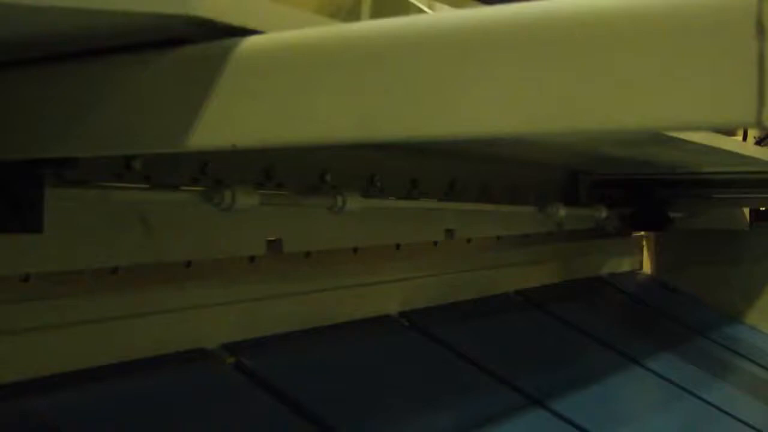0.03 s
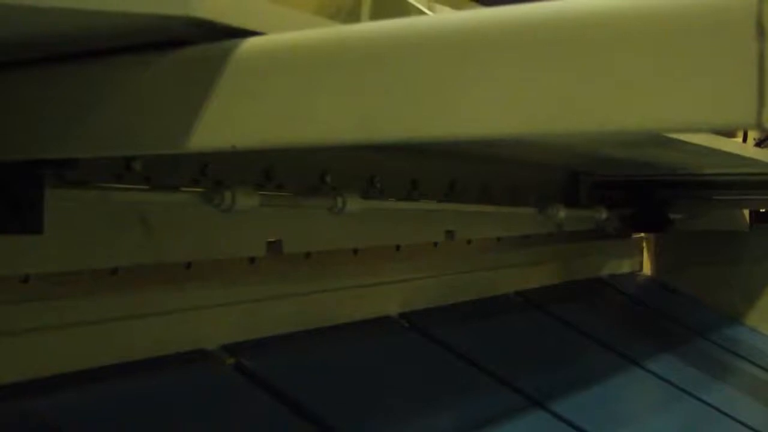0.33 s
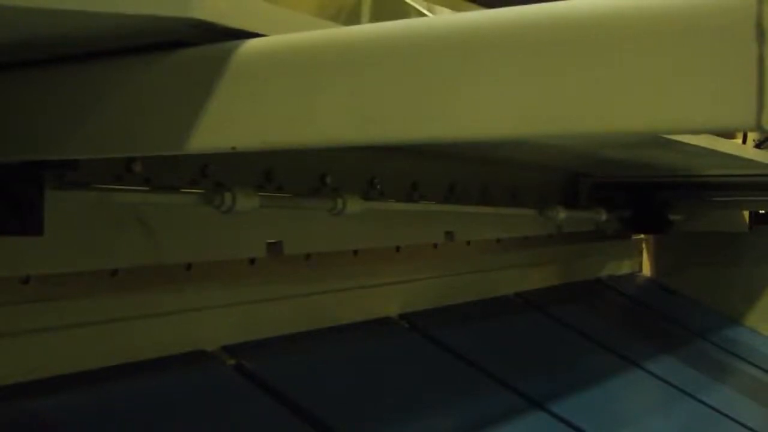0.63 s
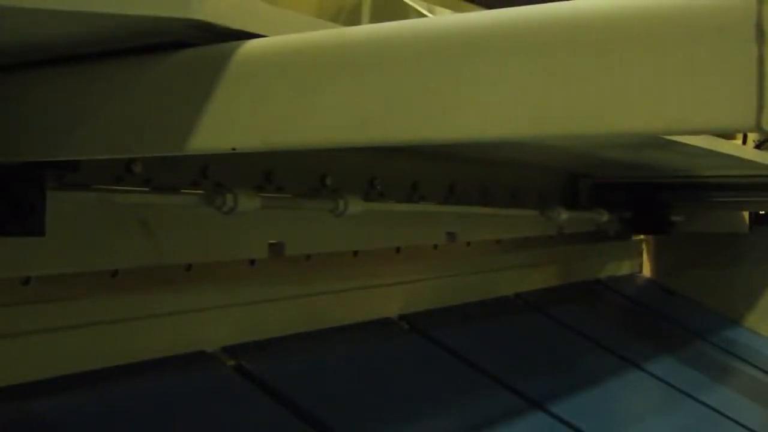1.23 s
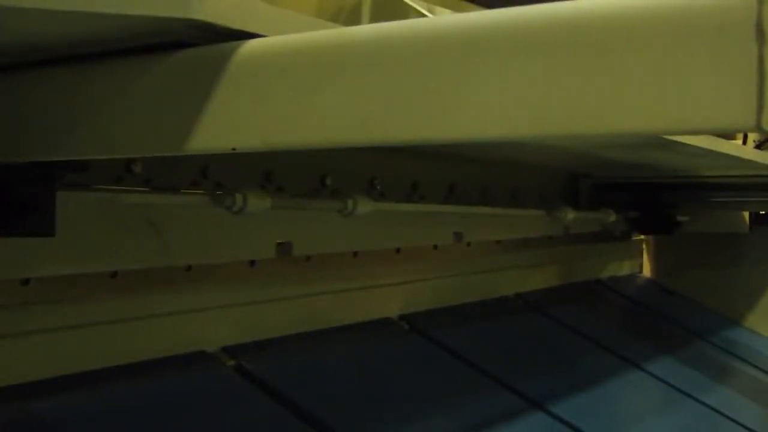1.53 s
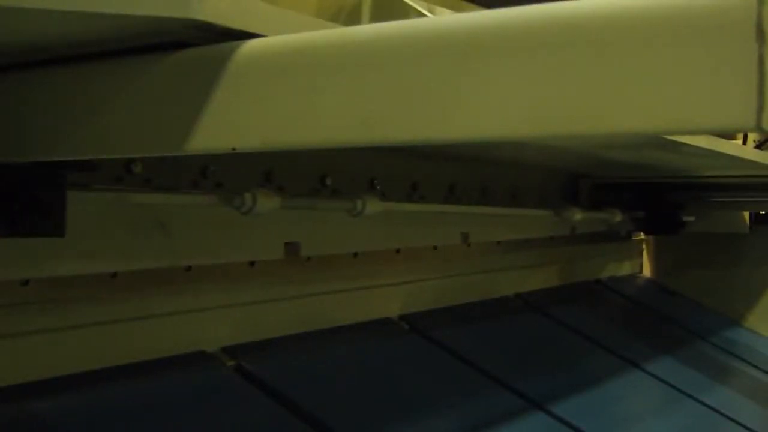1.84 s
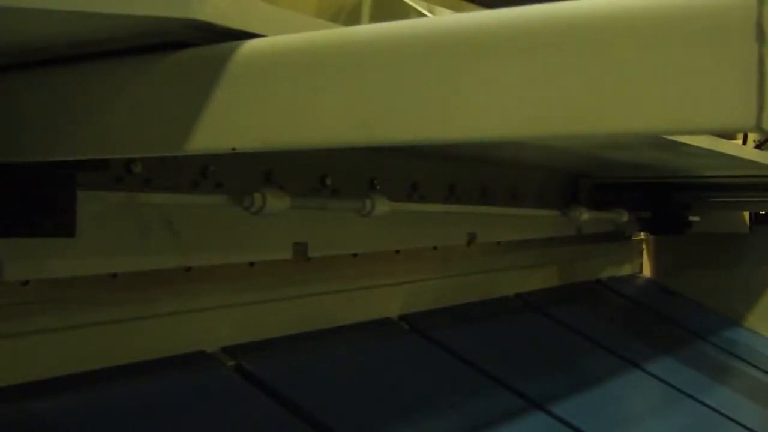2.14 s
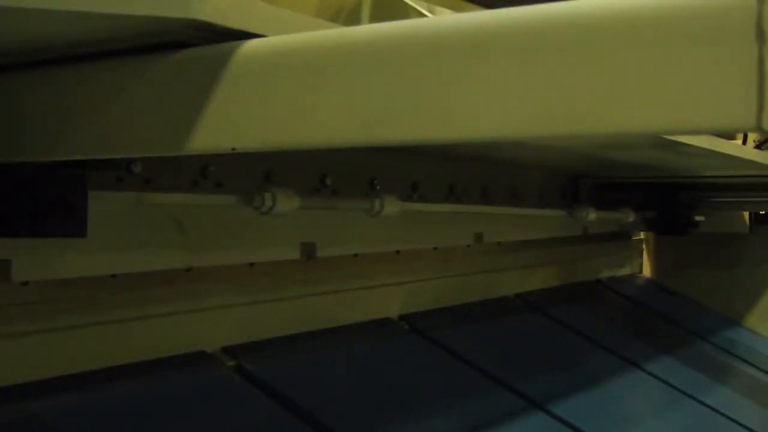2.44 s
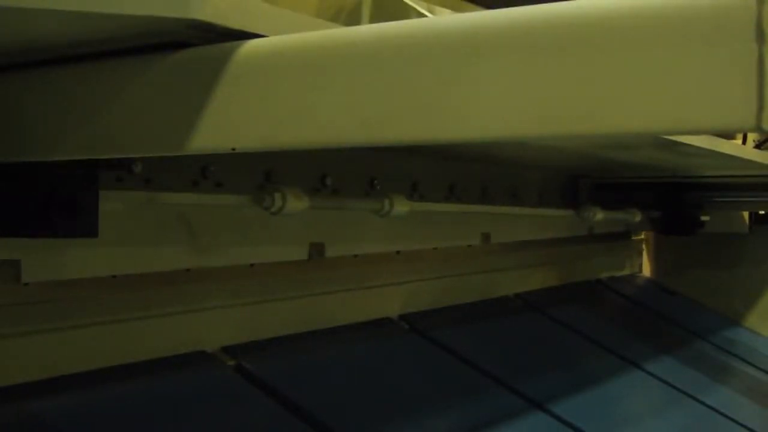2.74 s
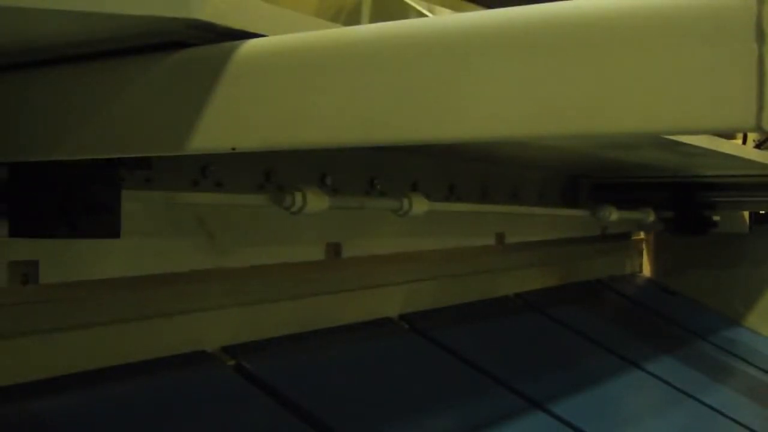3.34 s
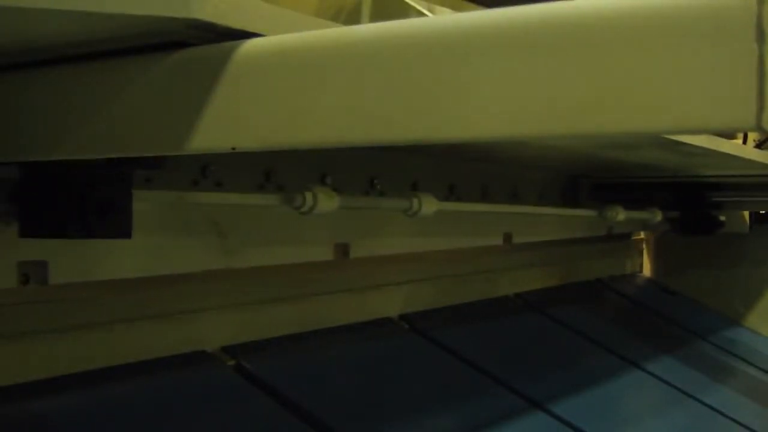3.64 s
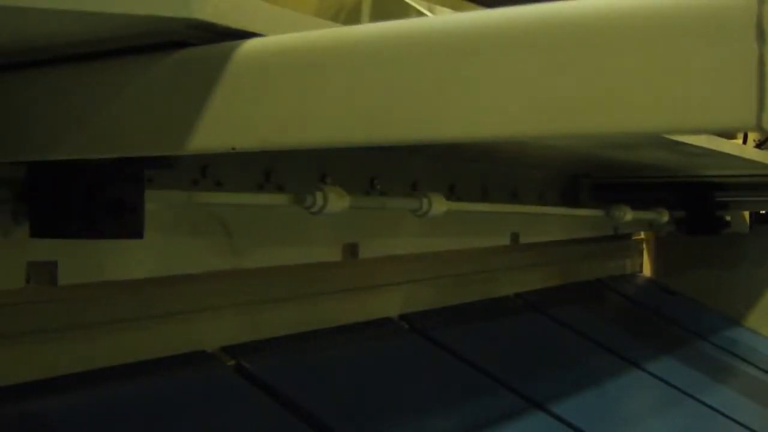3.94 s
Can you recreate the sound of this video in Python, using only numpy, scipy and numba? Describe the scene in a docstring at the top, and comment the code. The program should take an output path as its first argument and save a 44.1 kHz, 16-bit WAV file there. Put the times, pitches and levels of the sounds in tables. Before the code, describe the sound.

Motorised whirr of a metal shear's back gauge travelling, over a humming, hissing pump.

```python
"""Behind a sheet-metal shear, the hydraulic pump hums, whines and hisses throughout, and a valve sings.
The back gauge starts to travel: its lead screw whirrs and throbs at a tight spot once a turn,
and its carriage scrapes along the guides, where sliding friction excites the modes of the rail.
Reflections in the steel housing spread the sound; the recorder's gain ducks as the screw gets loud.
"""
import sys
import numpy as np
from scipy import signal
from scipy.fft import rfft, irfft
from scipy.io import wavfile
from scipy.ndimage import uniform_filter1d, map_coordinates
from numba import njit

SR = 44100
rng = np.random.default_rng(int(sys.argv[2]) if len(sys.argv) > 2 else 0)


def dump(signal):
    """Clip the signal to [-1, 1] and save it as 16-bit WAV at the path in sys.argv[1]."""
    limited = np.clip(np.atleast_2d(signal).T, -1, 1)
    pcm = np.round(limited * 32767).astype(np.int16)
    wavfile.write(sys.argv[1], SR, pcm)


N = 176400
T = np.arange(N) / SR
FREQS = np.fft.rfftfreq(N, 1 / SR)


def lead_screw(turn_hz=10.663, tight_spot_s=2.27, upper_above_hz=600, flicker_db=1.63):
    """Harmonics of the turn rate interfere to swell at the tight spot; rolling noise throbs with them."""
    # screw tones: multiple (rounded to a harmonic), level_db, scatter_cycles, drift_db_per_s
    screw_tones = [(15, -53, 0.79, -1), (20, -45.5, 0.95, 4.5), (25, -42, 0.78, 1.5), (26, -41.5, 0.48, 1),
                   (38, -32, 0.97, 0.5), (40, -24, 0.13, 1.5), (41, -27.5, 0.14, 0.5),
                   (42, -27.5, 0.018, 1.5), (43, -29, 0.055, 1.5), (50, -30.5, 1, -2), (54, -44, 1, 7),
                   (54.8, -50, 1, -3), (67.34, -24, 0, -1.5), (67.95, -28, 0.04, -1.5),
                   (68.4, -35.5, 0.024, -1.5), (75, -41, 0.71, 8.5), (76.45, -29, 0.88, 1),
                   (86, -37, 0.85, 2.5), (92, -30, 0.43, 1), (94.95, -29.5, 1, 1), (99.2, -29.5, 0.76, -3),
                   (104.6, -29, 0.91, -4), (112, -31.5, 0.7, -5), (116.2, -34, 0.25, -10.5),
                   (116.8, -32, 0.5, -1), (117.6, -26, 0.12, -2), (155.4, -39, 0.85, -1)]
    # level of the whole screw: time_s, level_db
    drive_level = [(0, -67), (1.1, -52), (1.22, -8), (1.32, 3), (1.45, 1), (1.8, -0.5), (2.35, 1),
                   (2.65, 2), (2.85, -0.5), (3.4, 1), (3.85, -0.5), (4, -1.5)]
    # further gain of the upper tones and rolling noise: time_s, gain_db
    upper_level = [(1.2, -3), (1.6, 0.5), (2.3, 1), (2.65, -1), (2.9, -0.5), (3.45, -3.5), (3.65, -1),
                   (4, 3)]
    # rolling noise of the nut: frequency_hz, density_db
    roll_spectrum = [(60, -46), (120, -29), (160, -19.5), (280, -8.5), (370, -9), (410, -5.5), (465, -7),
                     (500, -2), (560, 0), (720, -3.5), (850, -1.5), (1100, -2), (1280, -3), (1400, -9),
                     (1700, -8.5), (2400, -16.5), (4500, -33), (12000, -44)]
    turns = turn_hz * (T - tight_spot_s) + 0.00092 * walk(7)  # slight slip
    upper_gain, tones = curve(upper_level), 0
    for multiple, db, scatter, drift in screw_tones:
        offset = scatter * rng.uniform(-0.51, 0.52)  # without scatter, crests meet at the tight spot
        tone = np.sqrt(2) * np.cos(2 * np.pi * (round(multiple) * turns + offset))
        gain = undb(db + drift * (T - tight_spot_s) + flicker_db * walk(5.5))
        tones += tone * gain * (upper_gain if multiple * turn_hz > upper_above_hz else 1)
    throb = 1 + 0.11 * np.cos(2 * np.pi * (turns + 0.015 * turn_hz))  # peaks 15 ms before the tight spot
    roll = undb(-17.5) * colour(rotor_noise(turns, turn_hz, repeat_share=0.44), roll_spectrum)
    return curve(drive_level) * (tones + upper_gain * throb * roll)


def carriage():
    """Sliding friction excites the rail's modes and rasps where the carriage bites; brief tones ring."""
    # level of the scrape: time_s, level_db
    scrape_level = [(0, -55), (.55, -44), (.8, -28.5), (1.08, -25.5), (1.16, -19), (1.25, -15),
                    (1.36, -17.5), (1.6, -20.5), (2, -33.5), (2.66, -30), (2.715, -10), (2.78, -12),
                    (2.95, -14.5), (3.22, -14.5), (3.5, -20.5), (4, -28.5)]
    # spectrum of the scrape: frequency_hz, density_db
    scrape_spectrum = [(100, -42), (500, -20), (950, 5.5), (1550, 1), (2100, 0), (2500, -4), (3300, -6),
                       (4300, -14), (5500, -24), (8000, -30), (12000, -41)]
    # guide rail modes, relative to the scrape: pitch_hz, level_db
    rail_modes = [(1545, -7.5), (1670, -16), (1820, -12.5), (2065, -17), (2380, -18.5), (2770, -18),
                  (2900, -20), (3480, -23)]
    # ringing as the screw runs up and the carriage slides: peak_s, pitch_hz, level_db, half_width_s
    brief_tones = [(0.974, 1026, -26.5, 0.16), (1.186, 1308, -24, 0.083), (1.3, 1095, -23, 0.18),
                   (1.55, 1120, -28, 0.073), (2.712, 1550, -18, .035), (2.737, 2750, -20.5, 0.052),
                   (3.62, 977, -20, 0.068)]
    # rasps: peak_s, level_db, half_width_s
    bites = [(1.17, -27, 0.097), (2.715, -21.5, .02), (3.01, -24, 0.038), (3.202, -30, 0.17)]
    # spectrum of the rasps: frequency_hz, density_db
    rasp_spectrum = [(500, -28), (2000, -6), (3400, 6), (4200, 2), (5000, -3), (6300, -6.5), (8000, -11.5),
                     (12000, -14.5)]
    rail = sum(undb(db) * resonance(hz, width_hz=29) for hz, db in rail_modes)
    scrape = curve(scrape_level) * (colour(friction_noise(), scrape_spectrum) + rail)
    ringing = sum(swell(at, db, span) * resonance(hz, width_hz=56) for at, hz, db, span in brief_tones)
    rasps = sum(swell(*bite) for bite in bites) * colour(friction_noise(), rasp_spectrum)
    return scrape + ringing + rasps


def pump(pulse_hz=119.57, wander=0.00038, flicker_db=1.5):
    """Pressure pulsation makes a harmonic hum and modulates the oil hiss; motor and valves whine."""
    # hum: harmonic, level_db
    hum_tones = [(1, -53), (2, -39.5), (3, -34), (4, -35), (6, -45.5), (7, -39.5), (8, -34), (10, -37),
                 (12, -35), (14, -35.5)]
    # whines of motor and valves: pitch_hz, level_db
    whine_tones = [(661, -40.5), (1109, -42.5), (1287, -37.5), (1475, -46.5), (1757, -48.5), (1960, -37),
                   (2654, -44.5), (2778, -53), (3731, -42), (3881, -41.5), (4043, -46), (4393, -48),
                   (4527, -45), (5986, -50), (6202, -47.5), (6422, -56), (6465, -55), (7617, -53.5)]
    # oil hiss: frequency_hz, density_db
    hiss_spectrum = [(30, -40), (58, -46), (100, -22.5), (160, -14), (250, -10.5), (330, -7), (420, -5.5),
                     (600, -4), (1000, -5.5), (1700, -6), (2400, -11.5), (4000, -13), (5000, -18),
                     (6300, -19.5), (8300, -24.5), (10200, -21), (12000, -25.5)]
    cycles = np.cumsum(pulse_hz * (1 + wander * walk(6))) / SR

    def tone(multiple, db):
        """A flickering sinusoid that tracks the pulsation rate."""
        amplitude = np.sqrt(2) * undb(db + flicker_db * walk(6.5))
        return amplitude * np.sin(2 * np.pi * (multiple * cycles + rng.random()))

    hum = sum(tone(round(harmonic), db) for harmonic, db in hum_tones)
    whines = sum(tone(hz / pulse_hz, db) for hz, db in whine_tones)
    oil = rotor_noise(cycles / 4, pulse_hz / 4, repeat_share=0.2)  # four pulses per shaft turn
    pulsation = 1 + 0.036 * np.cos(2 * np.pi * cycles)
    hiss = undb(-22.5) * colour(oil * pulsation, hiss_spectrum)
    return hum + whines + hiss


def valve(pitch_hz=3907, flicker_db=0.5):
    """A narrow resonance driven by noise makes the valve sing."""
    # level of the singing: time_s, level_db
    valve_level = [(.15, -35.5), (.35, -39), (.46, -33.5), (.62, -34), (.75, -42), (.92, -35.5),
                   (1.08, -33.5), (1.25, -33.5), (1.5, -47), (1.7, -34), (2.7, -36), (4, -38.5)]
    return curve(valve_level) * undb(flicker_db * walk(8)) * resonance(pitch_hz, width_hz=143)


def housing(x, decay_s=0.055):
    """Reflections off steel panels decorrelate the treble; level and phase cues set the bass left."""
    # stereo field: frequency_hz, left_over_right_db, reflected_over_direct_db, left_lead_rad
    field = [(60, 3.5, -4, 0), (250, 6, -13.5, 0.14), (500, 4.5, -11, 0.44), (1010, 4, -6.5, 0.19),
             (2050, 1.2, -.5, 0.27), (4050, 2, -0.5, 0.25), (8100, 0.2, 2.5, 0.037), (12000, 0, 1.5, 0.023)]
    direct = rfft(x)
    echoes = rfft(rng.standard_normal(N) * np.exp(-T / decay_s))
    reflected = direct * echoes / np.abs(echoes) * undb(over_frequency(field, column=2))
    lean = undb(over_frequency(field, column=1))
    half_lead = np.exp(0.5j * over_frequency(field, column=3))
    left = (direct + reflected) * lean * half_lead
    right = (direct - reflected) / half_lead
    return irfft(np.array([left, right]) * 2 / (1 + lean), N)


def rotor_noise(turns, turn_hz, repeat_share):
    """Rotation makes noise partly periodic: the surface's share repeats each turn, the rest is fresh."""
    fresh, surface = rng.standard_normal((2, N))
    period = int(SR / turn_hz)
    repeating = map_coordinates(surface[:period], [turns % 1 * period], order=3, mode="grid-wrap")
    return np.sqrt(repeat_share) * repeating + np.sqrt(1 - repeat_share) * fresh


def friction_noise(grain_db=1):
    """Fast random amplitude modulation gives white noise the grain of sliding steel."""
    return rng.standard_normal(N) * undb(grain_db * walk(270))


def resonance(hz, width_hz):
    """Response of one steep resonance to white noise; rms 1."""
    response = 1 / (1 + (2 * (FREQS - hz) / width_hz) ** 2)
    return unit(irfft(rfft(rng.standard_normal(N)) * response, N))


def walk(rate_hz):
    """Smooth random fluctuation from low-passed noise; mean 0, rms 1."""
    low_pass = np.exp(-(FREQS / rate_hz) ** 2) * (FREQS > 0)
    return unit(irfft(rfft(rng.standard_normal(N)) * low_pass, N))


def colour(x, spectrum):
    """Filter by a spectral envelope; rms 1."""
    return unit(irfft(rfft(x) * undb(over_frequency(spectrum)), N))


def over_frequency(points, column=1):
    """Interpolate one column of a table over log frequency."""
    table = np.array(points, float)
    return np.interp(np.log(FREQS + 1), np.log(table[:, 0]), table[:, column])


def swell(peak_s, db, half_width_s):
    """Gaussian amplitude envelope."""
    return undb(db) * np.exp(-((T - peak_s) / half_width_s) ** 2)


def curve(points):
    """Amplitude envelope through points of time_s, level_db."""
    return undb(np.interp(T, *np.array(points, float).T))


def undb(db):
    """Decibels to amplitude ratio."""
    return 10 ** (np.asarray(db) / 20)


def unit(x):
    """Normalise to rms 1."""
    return x / np.std(x)


@njit
def follow(x, rise, fall):
    """One-pole envelope follower with separate attack and release."""
    out, level = np.empty(len(x)), x[0]
    for i in range(len(x)):
        level += (x[i] - level) * (rise if x[i] > level else fall)
        out[i] = level
    return out


def scene():
    """The sources superpose inside the steel housing."""
    return housing(pump() + valve() + lead_screw() + carriage())


def record(dry):
    """Dynamic compression: the recorder ducks loud sound; it also fades in and cuts the top treble."""
    threshold_db, ratio, attack_s, release_s = -15.5, 6.5, 0.019, 0.22
    start_s, fade_s, cutoff_hz = 0.1298, 0.011, 12200
    rms = np.sqrt(uniform_filter1d(np.mean(dry ** 2, axis=0), size=441) + 1e-12)
    envelope = follow(rms, 1 / (attack_s * SR), 1 / (release_s * SR))
    gain = np.minimum(1, undb(threshold_db) / envelope) ** (1 - 1 / ratio)
    fade_in = np.clip((T - start_s) / fade_s, 0, 1)
    low_pass = signal.ellip(8, 0.2, 80, cutoff_hz, fs=SR, output="sos")
    return signal.sosfilt(low_pass, dry * gain * fade_in)


dry = scene()
out = record(dry)
dump(out)
```